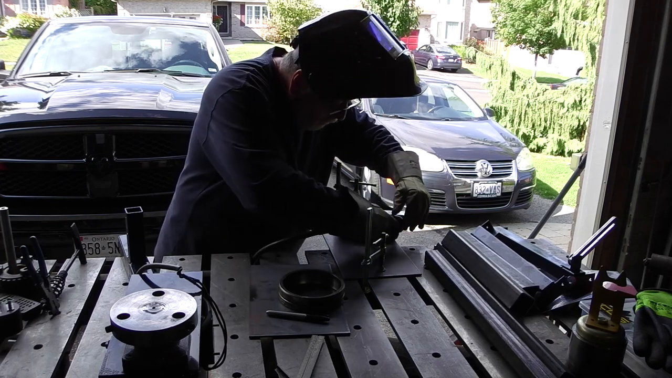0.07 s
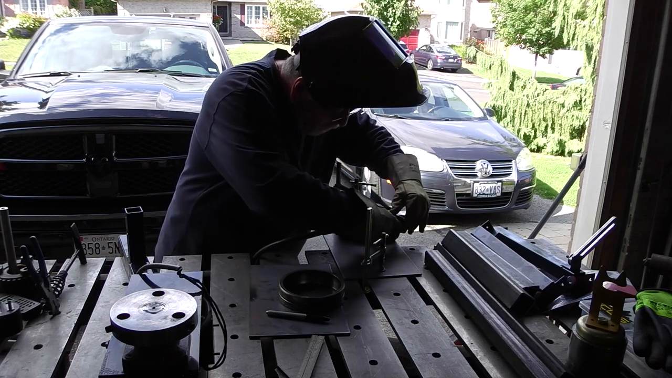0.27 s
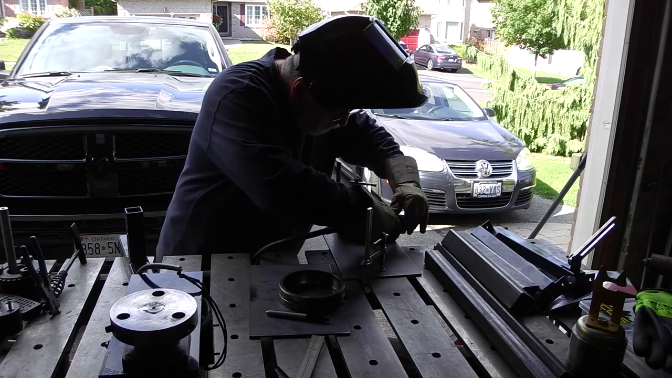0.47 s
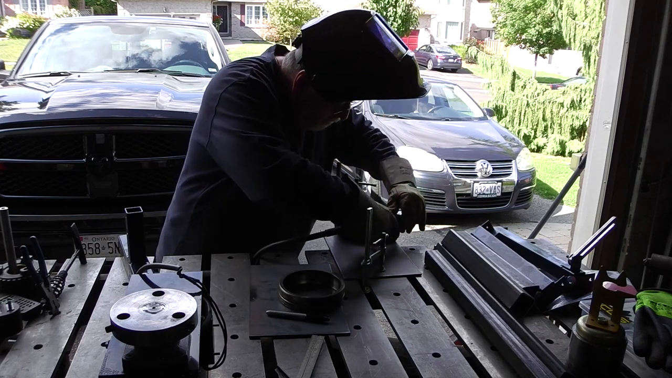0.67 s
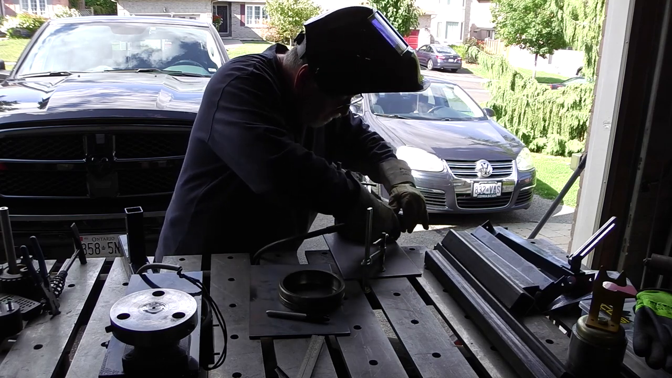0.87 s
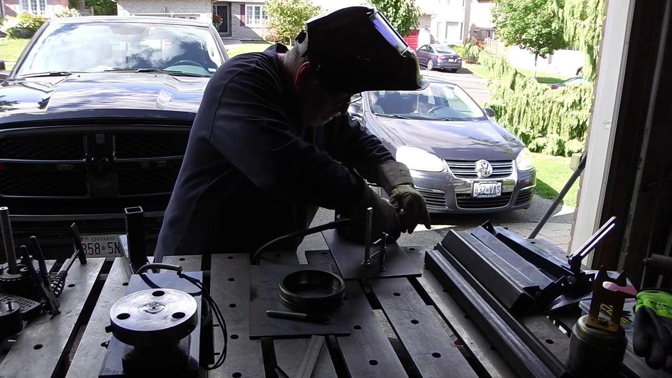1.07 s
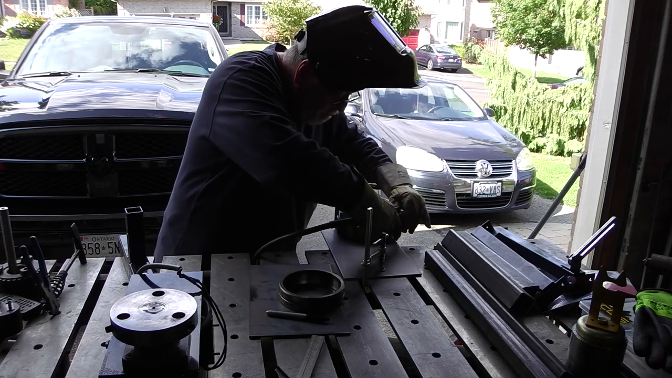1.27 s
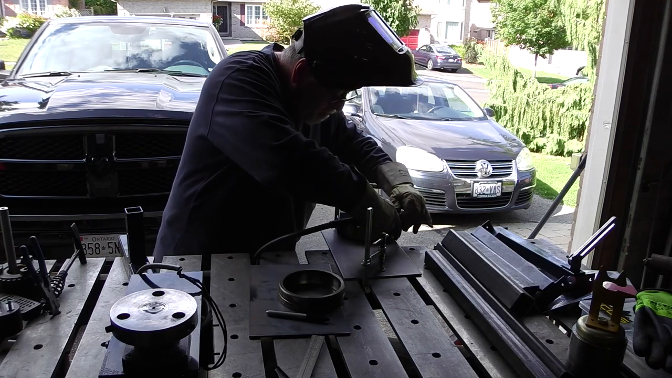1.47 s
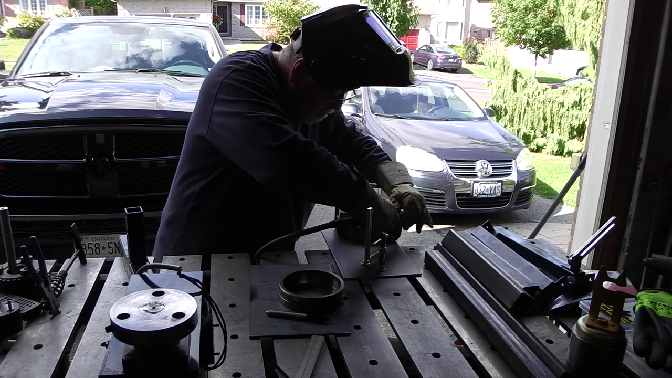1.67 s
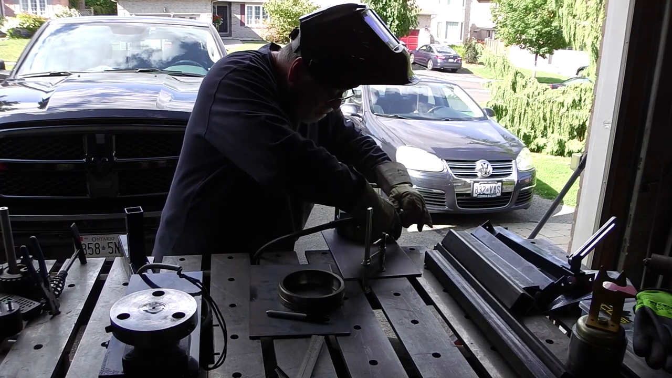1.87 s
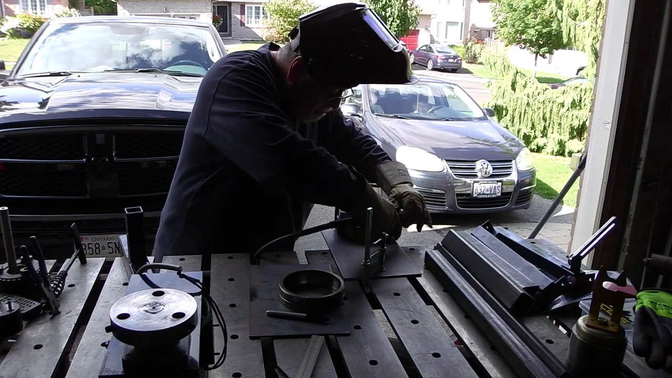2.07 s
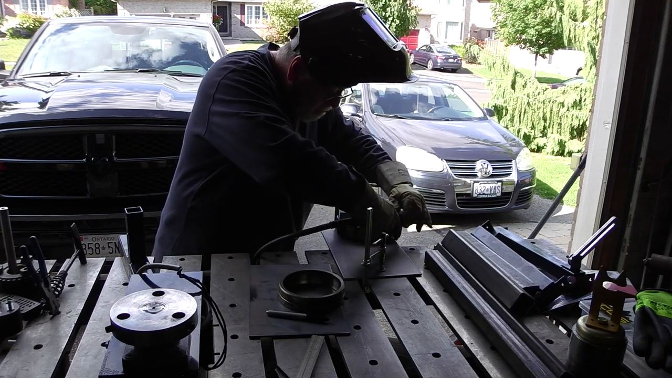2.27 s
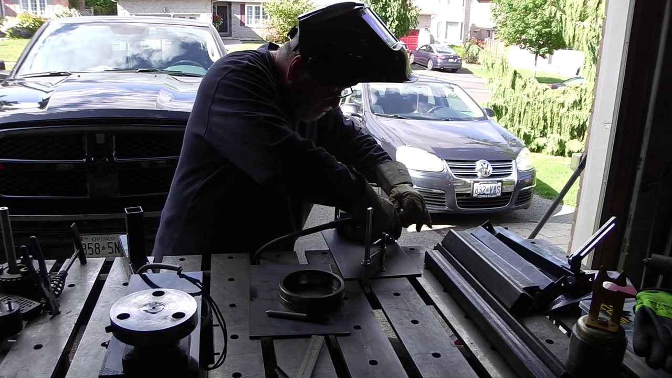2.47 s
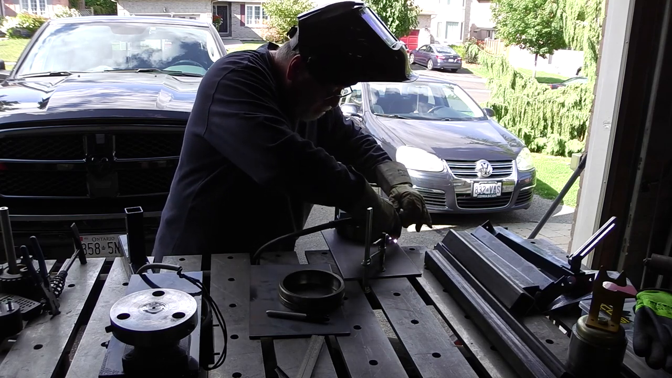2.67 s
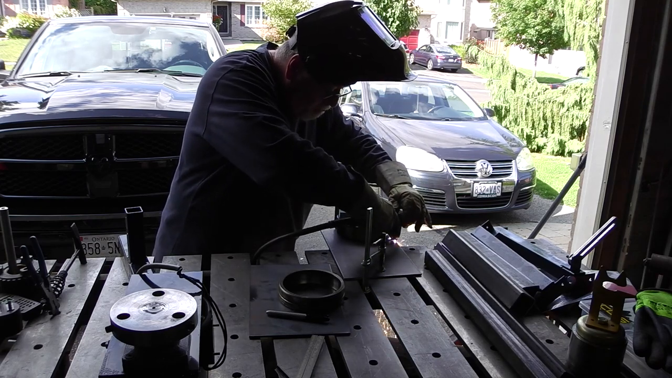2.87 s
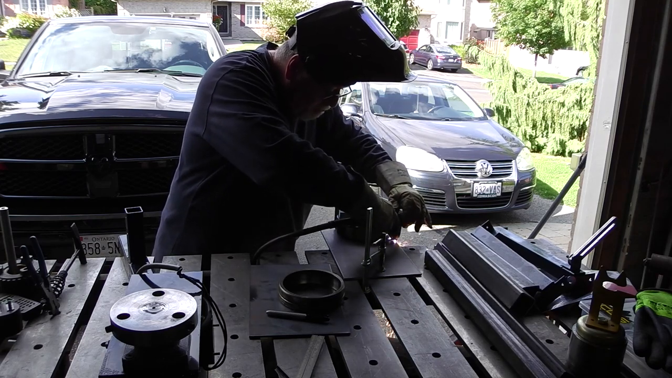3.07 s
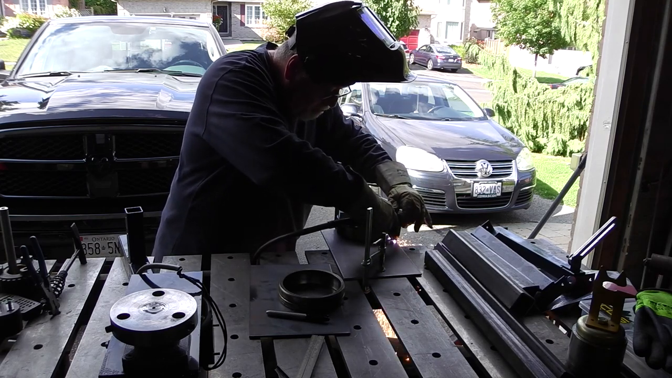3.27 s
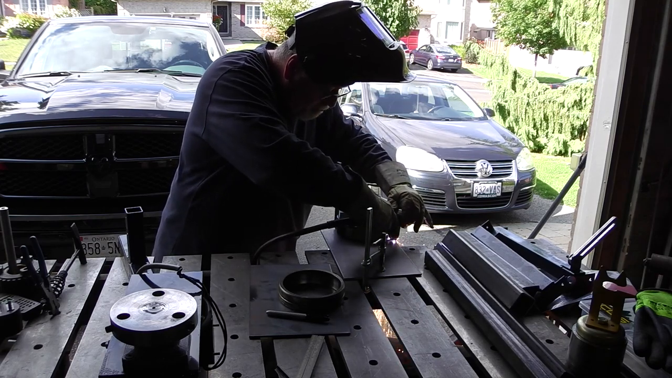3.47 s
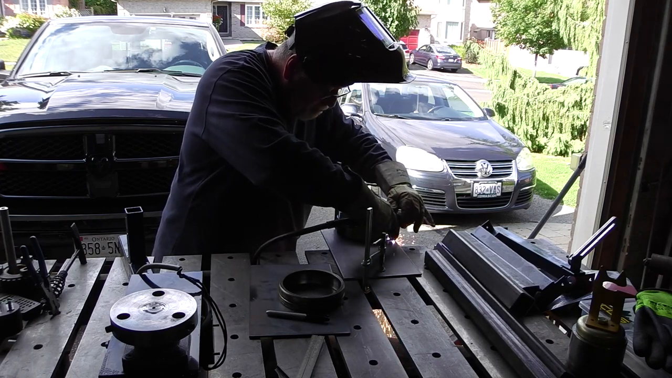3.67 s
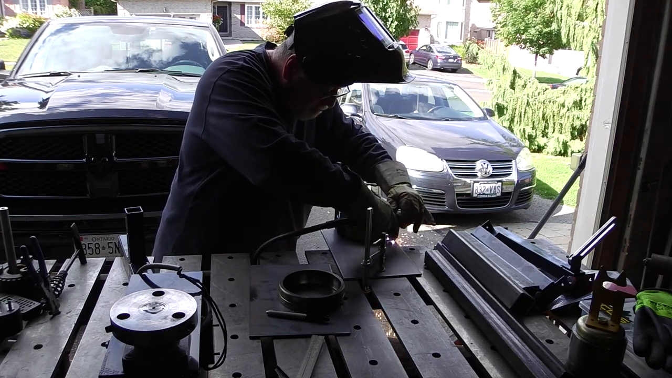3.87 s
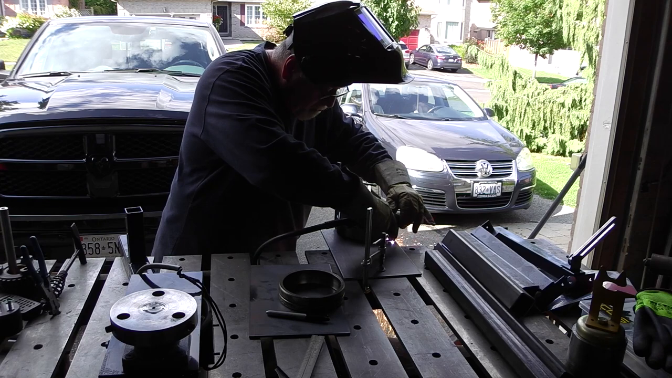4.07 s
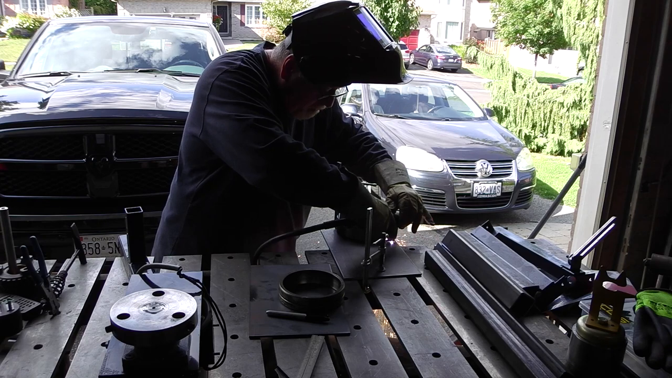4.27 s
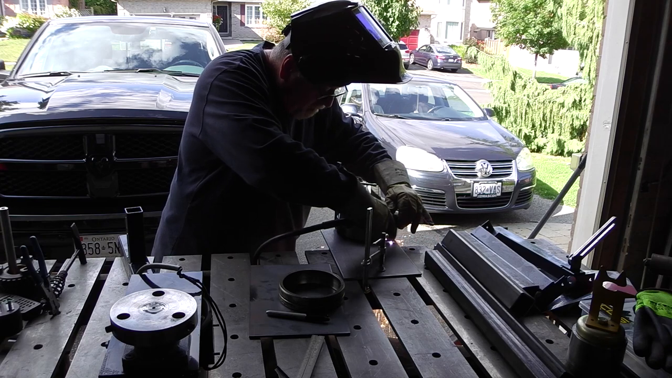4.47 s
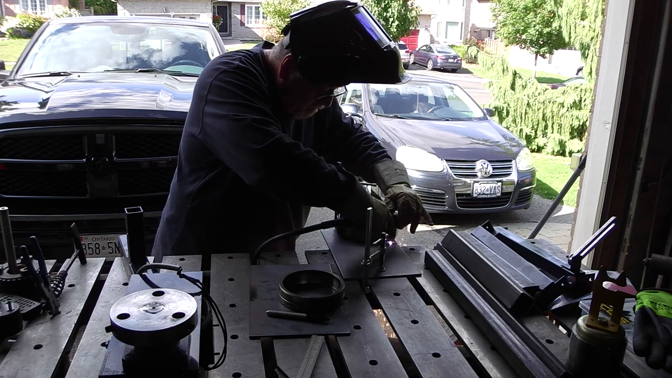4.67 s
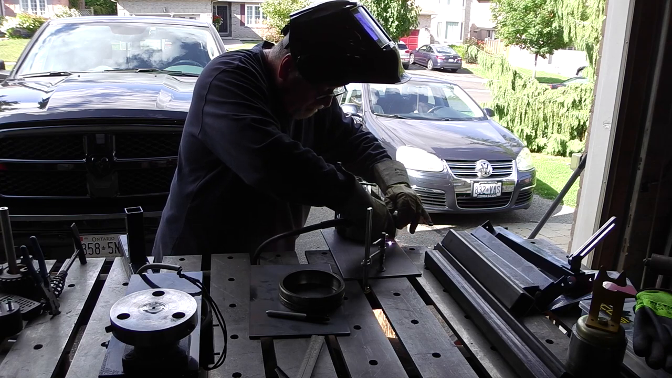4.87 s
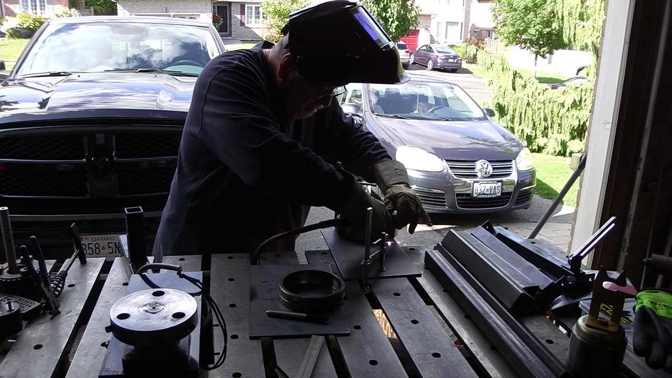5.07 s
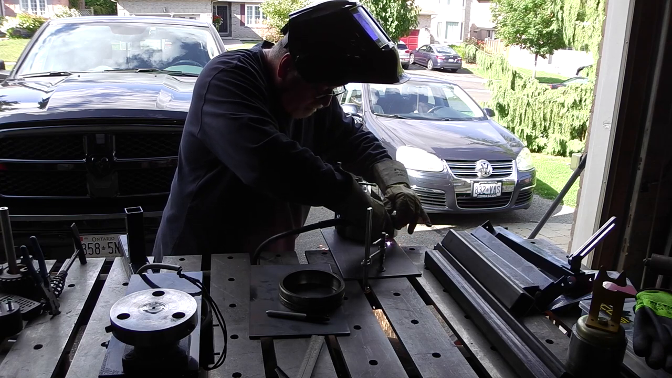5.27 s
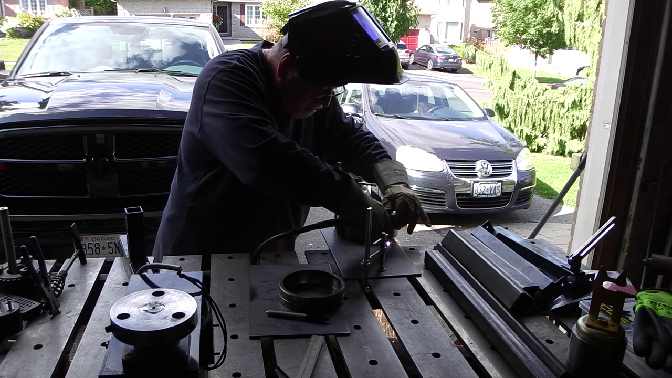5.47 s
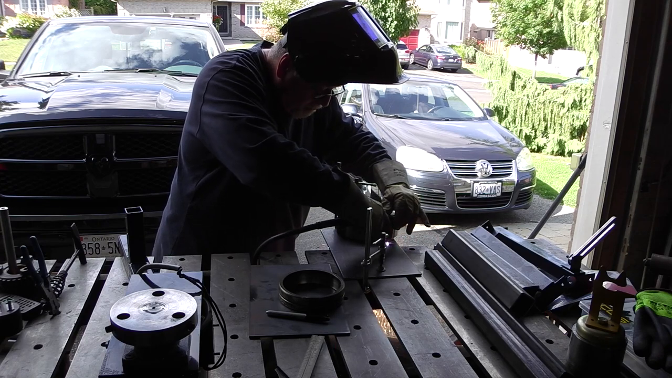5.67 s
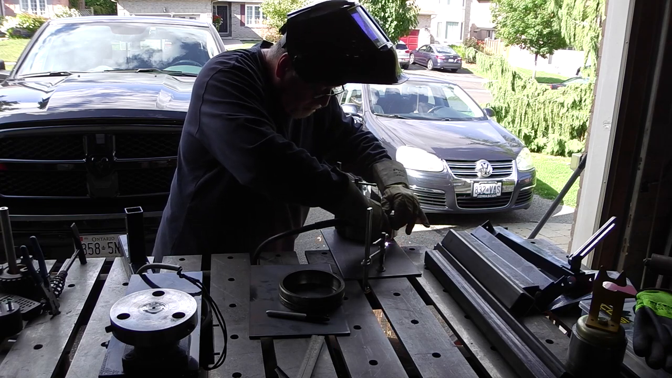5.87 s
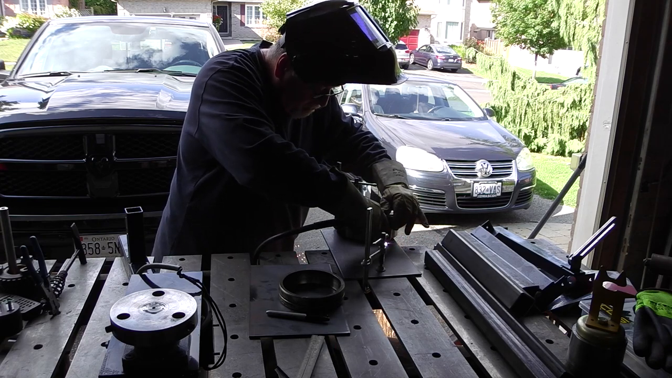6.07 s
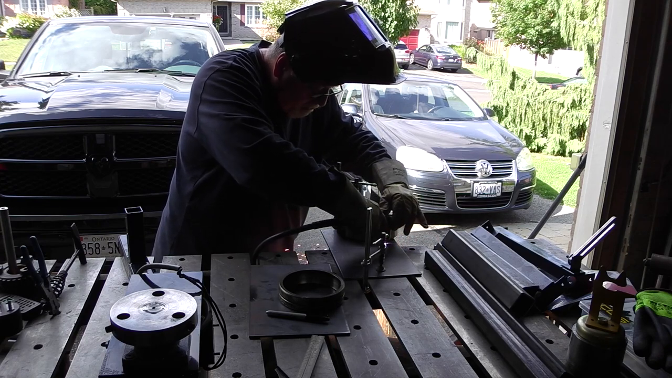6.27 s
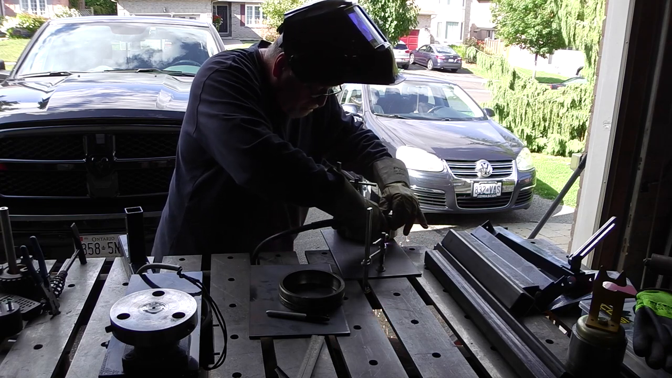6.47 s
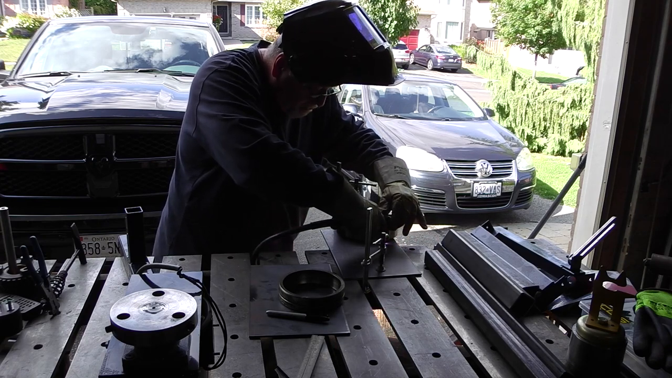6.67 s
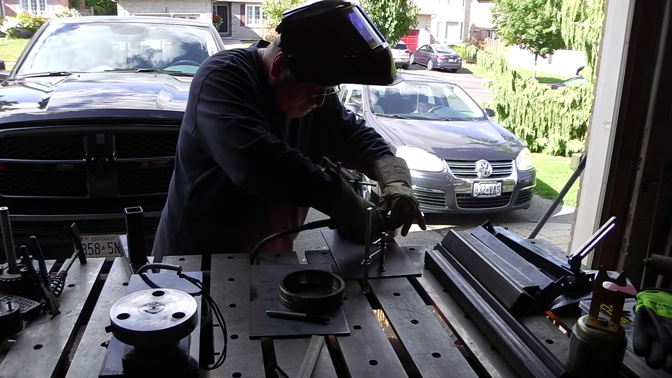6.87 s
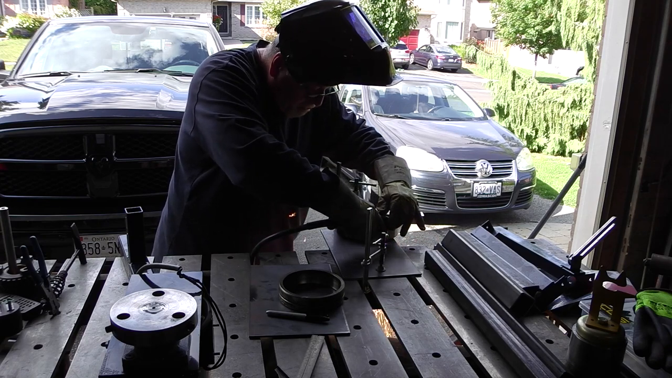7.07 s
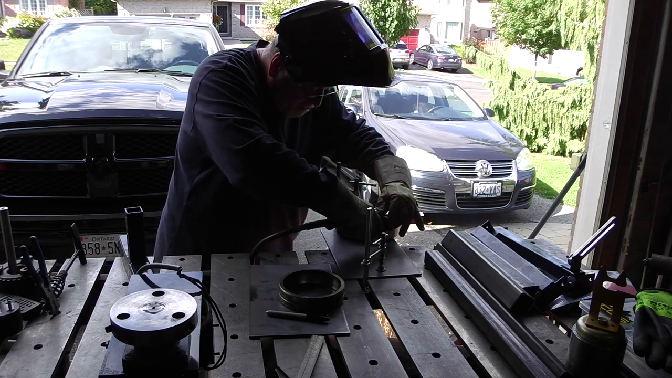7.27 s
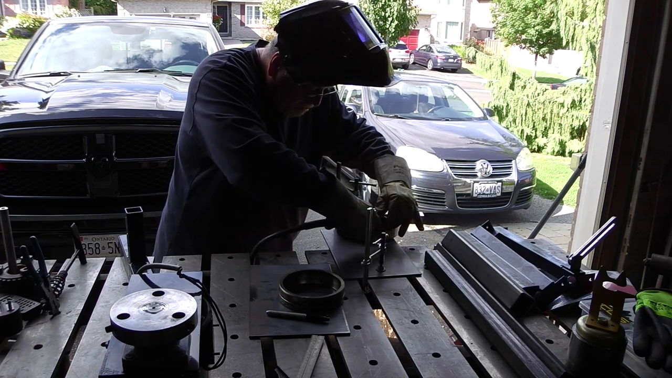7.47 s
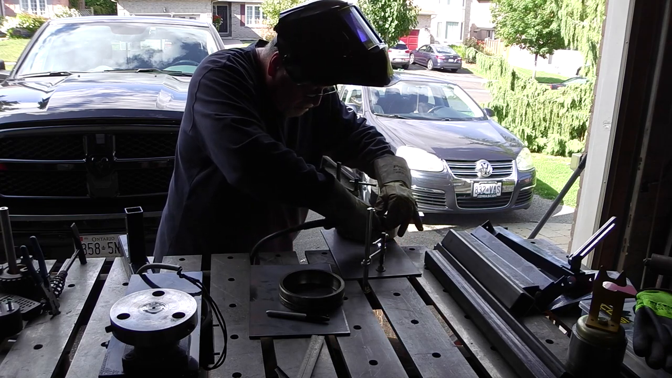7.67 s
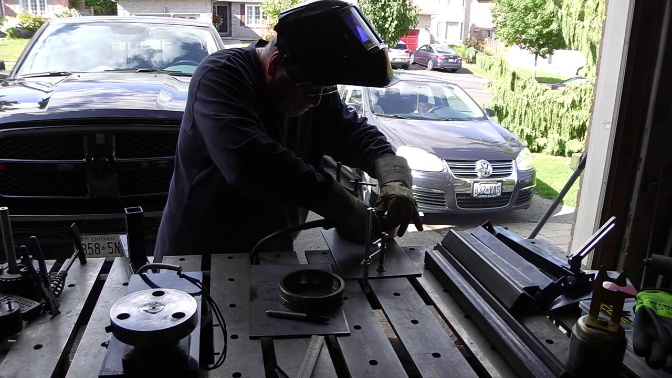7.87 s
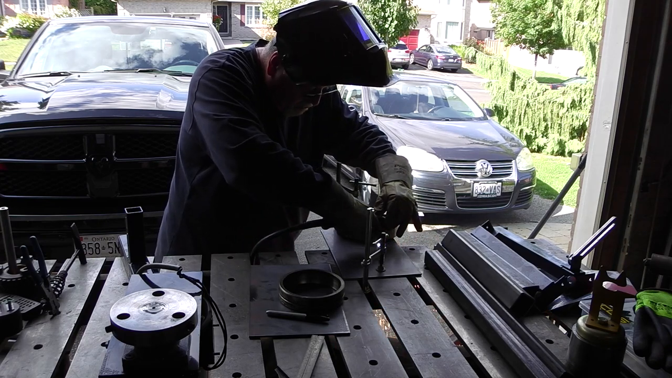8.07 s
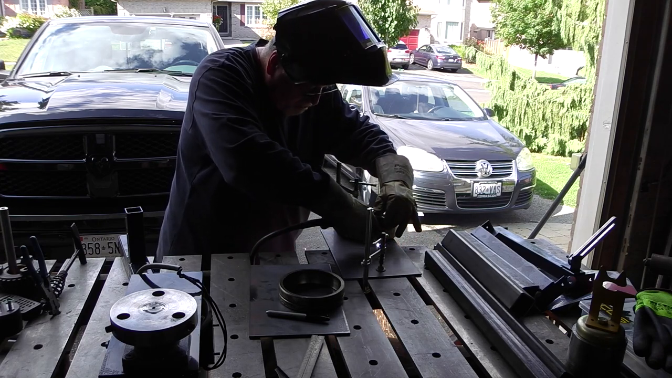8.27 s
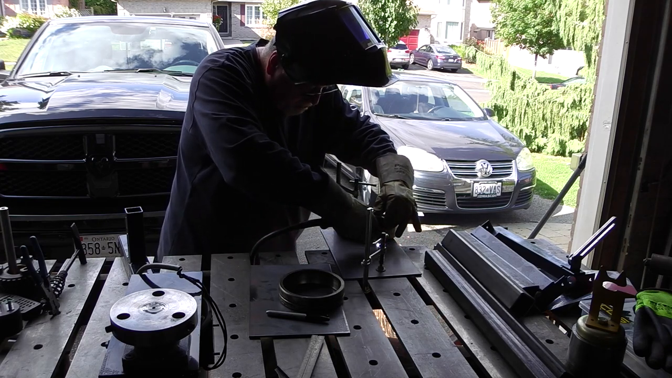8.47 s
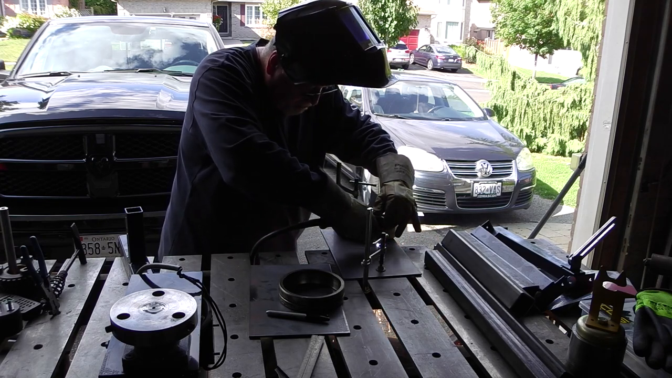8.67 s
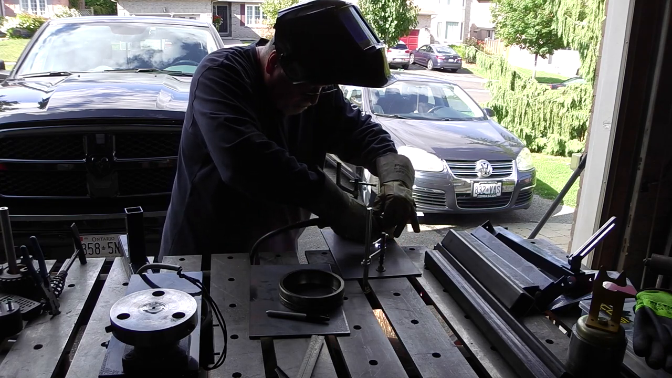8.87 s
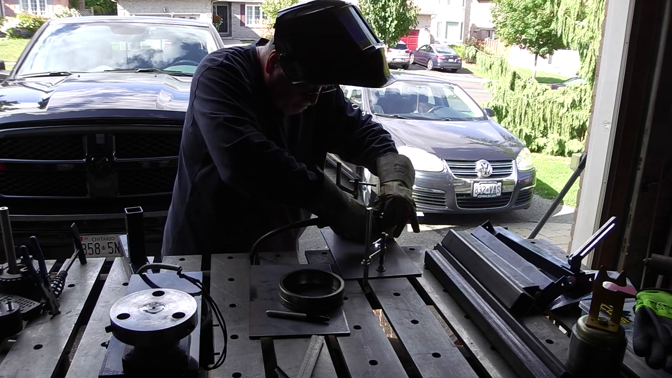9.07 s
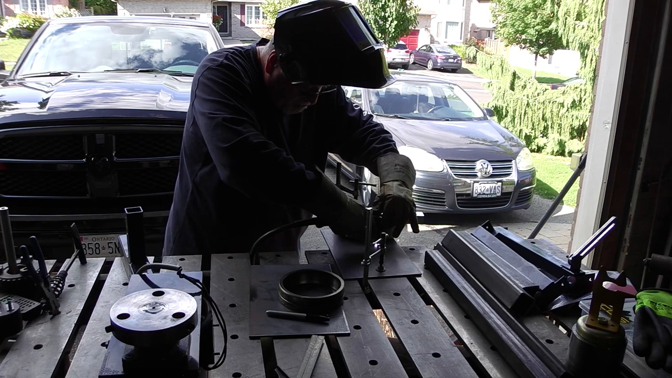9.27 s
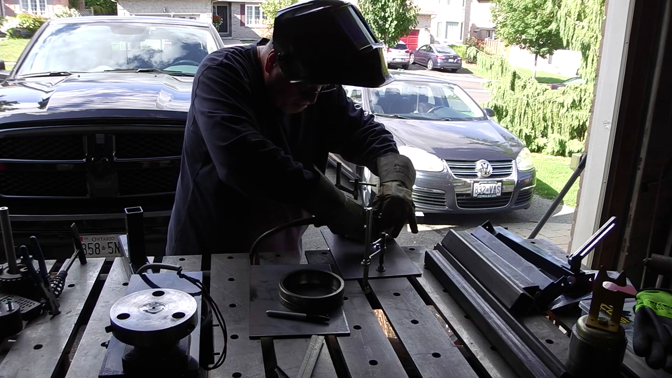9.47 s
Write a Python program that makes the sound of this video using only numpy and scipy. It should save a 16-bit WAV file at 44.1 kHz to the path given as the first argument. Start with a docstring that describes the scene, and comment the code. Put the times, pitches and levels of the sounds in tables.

```python
"""A plasma torch on a circle guide cuts steel plate on a bench in an open garage.
First the guide knocks on the ringing plate and the tip ticks and slides, over the hum of a machine.
Then air hisses out (shaped noise), the arc snaps alight and a hoarse whistle sounds as the jet digs a pit.
The jet pierces the plate and hisses round the circle, spitting crackling melt; all this is filtered noise.
As the loud treble begins, an automatic gain control pushes everything down, so the hum sinks far back."""
import sys
import numpy as np
from scipy import signal
from scipy.fft import rfft, irfft, next_fast_len
from scipy.io import wavfile
from scipy.ndimage import uniform_filter1d, map_coordinates

SR = 44100
rng = np.random.default_rng(int(sys.argv[2]) if len(sys.argv) > 2 else 0)


def pcm_store(signal):
    """Save signal as 16-bit PCM."""
    levels = np.round(np.clip(np.atleast_2d(signal), -1, 1) * 32767)
    wavfile.write(sys.argv[1], SR, levels.astype(np.int16).T)


N = 420713
T = np.arange(N) / SR  # time of each sample, s
HZ = np.fft.rfftfreq(N, 1 / SR)

# Tone colours, which set shape but not loudness: (frequency [Hz], relative level [dB per Hz])
HISS_COLOUR = [(200, -46), (1500, -24.5), (3000, -13), (4400, -11), (5550, -10), (5900, -6.5), (8000, -4),
               (9500, -1), (12000, -0.5), (14000, 0.5), (15000, -2), (15700, -6)]
SLOT_COLOUR = [(200, -36), (1500, -24), (2200, -7), (4400, -5), (6000, -2), (7200, -0.5), (9000, 0),
               (12000, -10), (16000, -22)]
ROAR_COLOUR = [(100, -48), (400, -20.5), (1000, -10), (1450, -0.5), (2000, 2), (3000, -7.5), (4500, -5),
               (8000, -6.5), (16000, -48)]
SPATTER_COLOUR = [(30, -35), (130, -39), (215, -10), (500, -2), (1000, 4), (2000, -3.5), (4000, -7),
                  (16000, -35)]
PUFF_COLOUR = [(60, -38), (150, -22), (245, 1), (380, 0), (600, -3.5), (1200, -12), (5000, -45)]
AIR_COLOUR = [(100, -28), (400, 1), (1500, -8), (3500, 3), (6000, 5), (12000, 5.5), (16000, 1)]
RATTLE_COLOUR = [(60, -45), (300, -13), (550, 0.5), (1000, 2.5), (1800, 5), (2700, -1.5), (3600, -2.5),
                 (4400, -13), (8000, -23), (16000, -33)]
SHOP_COLOUR = [(25, -33), (44, -28), (62, -13), (95, -9.5), (150, -13.5), (235, -18), (350, -20),
               (700, -20.5), (1000, -22), (1450, -24.5), (3500, -29.5), (7700, -38), (15500, -47)]  # fan air and the street

# Resonances of the nozzle, fresh hole, long slot and plate: (frequency [Hz], width [Hz], height over colour [dB])
NOZZLE_PEAKS = [(6990, 110, 3.7), (7250, 150, 1.8), (9100, 49, 1.5), (9400, 70, 2.5), (9530, 71, 2),
                (10400, 90, 1.3), (10560, 160, 2), (11440, 110, 2), (13500, 100, 2.3)]
HOLE_PEAKS = [(2090, 200, 4), (2440, 130, 8), (2900, 54, 3), (3120, 80, 6.5), (3530, 180, 10.5),
              (3660, 120, 2.5), (3785, 60, 8), (3890, 130, 7), (4330, 50, 0), (4560, 120, 2),
              (5270, 150, 4.5)]
SLOT_PEAKS = [(1710, 90, 9), (1960, 120, 6.5), (2480, 65, 6.5), (3000, 130, 7), (3370, 120, 5.5),
              (3546, 160, 9), (3750, 160, 3.5), (5810, 70, 10), (6240, 110, 5), (6950, 90, 8)]
PLATE_PEAKS = [(359, 37, 3), (570, 50, 2), (734, 86, 5.5), (1025, 56, 5), (1180, 50, -2), (2500, 250, 5.5),
               (3280, 350, 5)]

# Strength of the jet at the nozzle as the hand guides the torch: (time [s], relative hiss level [dB])
NOZZLE_LEVEL = [(2.34, -9.5), (2.4, -13.5), (2.53, -7), (2.6, -11), (2.65, -7), (3.05, -7.5), (3.25, -5.5),
                (3.45, -7.5), (3.84, -3), (4.1, -7.5), (4.85, -4.5), (5.2, -6.5), (5.85, -4.5), (6.1, -7.5),
                (7.4, -6), (8.6, -6.5), (8.82, -5.5), (9.2, -7.5)]
# Top treble of the hiss: (time [s], level change [dB])
TOP_LEVEL = [(2.3, 0.5), (3.0, -0.5), (4.2, 1), (5.2, -0.5), (6.1, 1.5), (6.6, 2.2), (7.2, 1), (8.5, 0.5),
             (9.1, 1.3), (9.5, 5)]
# The jet catches the wall of the slot and swells: (middle [s], length [s], relative level [dB])
WALL_SWELLS = [(2.48, .12, -18), (2.665, 0.082, -10), (2.87, 0.25, -9.5), (3.1, 0.21, -11.5),
               (3.46, 0.054, -13.5), (3.69, 0.18, -11.5), (3.91, 0.079, -14.5), (4.47, 0.049, -18),
               (4.7, 0.22, -13), (5.33, 0.16, -14), (5.85, 0.25, -19), (6.44, 0.27, -11.5),
               (6.7, 0.19, -13.5), (7.62, 0.28, -13), (7.86, 0.36, -13), (8.12, 0.093, -23),
               (8.4, 0.39, -15), (8.64, 0.19, -15.5), (9.1, 0.17, -13.5), (9.43, 0.26, -13.5)]
# The jet weakens for a moment: (middle [s], length [s], depth [dB]); a negative depth is a small lift
JET_DIPS = [(3.8, 0.051, 1.5), (5.027, 0.17, 0.5), (5.506, 0.12, 1.5), (6.137, .08, -0.5),
            (6.83, 0.11, 0.5), (8.008, 0.063, 3), (8.233, 0.083, 1.5), (9.233, .06, 1.4)]
# Gouts of melt blown out: (peak [s], length [s], relative spray level [dB], relative low puff level [dB])
GOUTS = [(2.35, .035, -39, -44), (2.682, 0.076, -31, -37.5), (2.9, .14, -39, -50), (3.1, .06, -33, -47),
         (3.177, 0.064, -28.5, -40), (3.37, .09, -36, -43), (3.538, .032, -26.5, -35),
         (3.74, .08, -33.5, -45), (3.932, 0.055, -25.5, -36.5), (4.067, 0.058, -34, -43),
         (4.235, .056, -40, -43), (4.41, .08, -36, -44), (4.795, .08, -36, -46), (5.05, .05, -34, -37),
         (5.13, 0.055, -37, -39), (5.34, 0.16, -39, -45), (5.59, 0.048, -26, -37), (5.768, .1, -37, -46),
         (5.968, 0.098, -34, -44), (6.14, 0.12, -31, -47), (6.237, 0.042, -27.5, -39), (6.6, .06, -36, -43),
         (6.736, 0.14, -28, -40), (7, .07, -32, -40), (7.138, 0.14, -32, -39.5), (7.43, 0.087, -38, -45),
         (7.52, 0.13, -36, -43.5), (8.09, 0.1, -24, -36), (8.772, 0.071, -26, -35.5), (8.86, .05, -36, -45),
         (9.14, .1, -38, -51), (9.31, .095, -26.5, -39.5), (9.51, .07, -33, -45)]
# The disc rings as it comes free:
# (middle [s], length [s], relative level [dB], centre [Hz], width [octaves])
DISC_RINGS = [(6.711, 0.09, -21, 2140, 0.28), (7.42, 0.12, -32, 1810, .3), (8.091, 0.09, -17.5, 2400, .6),
              (8.774, .06, -15.5, 3100, 0.27), (8.785, .05, -28, 1010, 0.081),
              (9.33, .11, -19.5, 2500, 0.24)]
# Snaps of ignition: (time [s], relative level [dB], centre [Hz], width [octaves], time to fall 60 dB [s])
IGNITION_SNAPS = [(2.2445, -46, 8000, 0.76, .03), (2.2752, -2, 4770, 0.25, 0.005),
                  (2.2965, -5.5, 2800, 0.6, 0.016), (2.297, -16.5, 600, 1.8, 0.031),
                  (2.3218, -1.5, 5940, 0.46, 0.04), (2.3225, -6, 4650, 0.066, .04),
                  (2.343, -15, 890, 2.3, 0.094), (2.345, -8.5, 2050, 0.2, 0.11)]
# The guide knocks on the plate: (time [s], relative level [dB], brightness [Hz], rattle time to fall 60 dB [s],
# relative ring strength [ratio], centre of the modes struck [Hz], their spread [octaves])
GUIDE_KNOCKS = [(0.0, -30, 6000, 0.25, 1.48, 1700, 1.9), (.0022, -22.5, 5500, .022, .4, 880, .3),
                (0.013, -34, 4500, .03, .8, 1800, .25), (0.0409, -34, 3500, .035, 0.4, 2100, .8),
                (1.312, -42, 2400, 0.066, .9, 814, 0.62), (1.3264, -47.5, 2000, .04, 5.5, 1040, .11),
                (1.3375, -51, 2600, .025, 1.0, 1100, .25)]
# Modes, the plate's own ringing notes: (frequency [Hz], relative level [dB], time to fall 60 dB [s])
PLATE_MODES = [(356, -6.5, 0.34), (555, -1.5, .3), (693, -5, .29), (892, 1.5, 0.2), (985, -5, 0.31),
               (1173, -4, .27), (1424, -6, .27), (1700, -8, .3), (1798, -1, 0.31), (1860, -6, .22),
               (2135, -8, 0.22), (2400, -10, .27), (2675, -4, 0.18), (3246, -0.5, .2), (3610, -4, .23),
               (4450, -13, 0.25)]
# Thin high ticks while the torch is lined up: (time [s], relative level [dB])
TIP_TICKS = [(.02, -58), (.216, -61), (.337, -60.5), (.716, -66), (1.009, -64), (1.424, -64), (1.463, -65),
             (1.612, -65), (1.857, -59), (1.945, -57)]
# The tip slides over steel: (middle [s], length [s], relative level [dB], centre [Hz], width [octaves])
TIP_SLIDES = [(.44, 0.17, -69, 8650, .035), (.52, 0.27, -66.5, 6800, 0.42), (1.735, 0.026, -57, 8900, .1),
              (1.845, 0.04, -66, 8500, .5)]
# Steady tones of the machine's motor and fan: (frequency [Hz], relative level [dB])
MACHINE_TONES = [(59, -65), (116.7, -60.5), (173, -63.5), (205, -71.5), (295, -70), (319, -68),
                 (352, -65.5), (613, -70), (1238, -67.5)]
# Two motor tones that swell and fade: (time [s], relative fundamental level [dB], relative octave level [dB])
MOTOR_LEVELS = [(0.1, -52, -60), (.42, -55.5, -53.5), (.7, -53, -56), (1.05, -57, -48.5), (1.3, -56, -64),
                (1.48, -58, -54), (1.64, -50, -58), (1.85, -56, -52), (2.2, -57, -52), (2.5, -53, -59)]
# The room tone is wide in the treble: (frequency [Hz], side minus middle [dB])
SHOP_WIDTH = [(80, -24), (250, -15), (1300, -17), (2400, -14), (3700, -9), (5600, -7), (9000, -1),
              (15000, -1)]
# Where the torch is heard: (time [s], left minus right [dB])
TORCH_PAN = [(2.3, -1.0), (4.5, -1.0), (6, -1.4), (9.5, -1.4)]
# Plate and bench throw back treble most: (frequency [Hz], relative level of the reflections [dB])
REFLECTIONS = [(100, -2.5), (1400, -3), (2200, -6.5), (3700, -4), (7000, -3), (15000, 2)]
# How alike reflected sound is in the two ears: (frequency [Hz], likeness [0 to 1])
EAR_LIKENESS = [(60, .3), (300, 0.74), (700, 0.66), (1400, 0.88), (2400, 1), (3700, 1), (5500, 0.25),
                (9000, 0.3), (15000, 0.14)]

AIR_ON_S, AIR_FULL_S, ARC_ON_S = 2.244, 2.279, 2.3215
THROUGH_S = 3.05  # the jet breaks through the plate
SLOT_SETTLE_S, ROAR_DROP_S = 1, 0.19  # how long each takes to settle after that
SLOT_PIERCE_DB, SLOT_RUN_DB, SLOT_GROWTH_DB_PER_S = -12, -16.5, 0.02
ROAR_PIERCE_DB, ROAR_RUN_DB = -21.5, -25.5
ROAR_BUILD_DB_PER_S, ROAR_FULL_S = 12, 3.16  # the roar builds as the hole deepens
ROAR_GROWTH_DB_PER_S = 1.01  # and grows again as the slot gets longer
SLOT_OPEN_PER_S = 0.19  # share of power passing each second from hole to long slot
HOLE_DRIFT, HOLE_DRIFT_HZ = 0.005, 7  # typical pitch wander as a share, and its speed
TOP_TREBLE_HZ = 11100
HUMP_STEEPNESS = 3  # 2 is a bell, more is squarer
GOUT_STEEPNESS, GOUT_LEAN = 1.47, 0.18  # a gout bursts out quickly and trails away
MODE_SPLIT_HZ = 14  # smallest gap between a mode and its twin
MOTOR_HZ, HUM_WAVER_HZ = 73.4, 5.2
BAND_LIMIT_HZ = 15730


def torch(air_db=-15.0, air_rise_db_per_s=1300):
    """Cold air builds up first; the arc then heats it to a far louder jet."""
    lit = np.clip((T - ARC_ON_S) / .001, 0, 1)
    seconds_to_full = np.maximum(AIR_FULL_S - np.maximum(T, AIR_ON_S), 0)
    air_level = amp(air_db - air_rise_db_per_s * seconds_to_full) * (T > AIR_ON_S)
    air = coloured(noise(), AIR_COLOUR) * air_level
    return air * (1 - lit) + lit * jet()


def jet(swell_roar_db=-12.5):
    """Rough gas flow at the nozzle, in the slot and under the plate, shaken together by the restless arc."""
    swells = humps(WALL_SWELLS)
    dips_db = sum(depth * np.exp(-np.minimum((2 * (T - s) / length_s) ** 2, 20))
                  for s, length_s, depth in JET_DIPS)
    slot_level = np.hypot(amp(slot_level_db()), swells)
    slot = slot_noise() * slot_level * amp(1.0 * wander(29))
    roar_level = np.hypot(amp(roar_level_db()), amp(swell_roar_db) * swells)
    roar = coloured(noise(), ROAR_COLOUR) * roar_level * amp(1.0 * wander(140))  # fast wander adds grit
    shared_db = 0.39 * wander(45) + 0.44 * wander(16) - dips_db
    return (nozzle_hiss() + slot + roar) * amp(shared_db)


def nozzle_hiss(hiss_db=1.5):
    """Gas rushing from the nozzle makes coloured noise; its top treble has a level of its own."""
    hiss = coloured(noise(), HISS_COLOUR, NOZZLE_PEAKS) * amp(curve(NOZZLE_LEVEL) + hiss_db)
    highpass = signal.butter(3, TOP_TREBLE_HZ, "high", fs=SR, output="sos")
    top = signal.sosfiltfilt(highpass, hiss)
    return hiss - top + top * amp(curve(TOP_LEVEL) + 0.1 * wander(20))


def slot_noise():
    """Rough flow in the cut: the fresh hole's resonances give way to those of the long slot."""
    opened = np.clip(SLOT_OPEN_PER_S * (T - THROUGH_S), 0, 1)
    hole = drifting(coloured(noise(), SLOT_COLOUR, HOLE_PEAKS))
    long_slot = coloured(noise(), SLOT_COLOUR, SLOT_PEAKS)
    return np.sqrt(1 - opened) * hole + np.sqrt(opened) * long_slot


def drifting(x):
    """The hole changes shape as the torch moves on: uneven reading speed makes its resonances wander."""
    lag = np.cumsum(HOLE_DRIFT * wander(HOLE_DRIFT_HZ))  # in samples
    return map_coordinates(x, [np.arange(N) + lag], order=3, mode="mirror")


def slot_level_db():
    """Piercing is loud in the slot; the sound settles once the jet runs freely through the plate."""
    running_db = SLOT_RUN_DB + SLOT_GROWTH_DB_PER_S * (T - THROUGH_S)
    return running_db + (SLOT_PIERCE_DB - running_db) * breakthrough(SLOT_SETTLE_S)


def roar_level_db():
    """The roar builds during piercing, collapses at breakthrough, then grows with the slot."""
    digging_db = ROAR_PIERCE_DB - ROAR_BUILD_DB_PER_S * np.maximum(ROAR_FULL_S - T, 0)
    running_db = ROAR_RUN_DB + ROAR_GROWTH_DB_PER_S * (T - THROUGH_S)
    return running_db + (digging_db - running_db) * breakthrough(ROAR_DROP_S)


def breakthrough(length_s):
    """1 while the jet is piercing, falling to 0 within length_s once it is through."""
    return np.clip(1 - (T - THROUGH_S) / length_s, 0, 1)


def melt(level_db=0.5, drops_per_s=1500, rush=0.66):
    """Molten drops crackle densely; gouts come with low puffs, and the disc rings under some heavier ones."""
    drop_db = 2.5 * np.minimum(rng.exponential(1, N), 4)
    drops = (rng.random(N) < drops_per_s / SR) * np.sign(noise()) * amp(drop_db)
    # the fine, uneven spray between gouts
    drizzle = amp(-39.5 + 2.2 * wander(3.0)) * (T > ARC_ON_S)
    sprays = humps([(s, length_s, db) for s, length_s, db, _ in GOUTS], GOUT_STEEPNESS, GOUT_LEAN)
    puffs = humps([(s, length_s, db) for s, length_s, _, db in GOUTS], GOUT_STEEPNESS, GOUT_LEAN)
    crackle = coloured(evened(drops) + rush * noise(), SPATTER_COLOUR, PLATE_PEAKS)
    spatter = crackle * np.hypot(drizzle, sprays) * amp(level_db)
    low_puffs = coloured(noise(), PUFF_COLOUR, PLATE_PEAKS) * puffs * amp(2.0 * wander(60))
    return (spatter + surges(DISC_RINGS)) * amp(2.0 * wander(67)) + low_puffs


def whistle(hz=3800, jitter_hz=90, level_db=-10, start_s=2.345, rise_s=0.021, hold_s=0.058, fall_60db_s=0.06):
    """The jet blows across the pit it is digging and whistles hoarsely until the pit opens."""
    phase = 2 * np.pi * np.cumsum(hz + jitter_hz * wander(350)) / SR
    tone = evened(np.sin(phase) * amp(3.0 * wander(200)))  # fast level changes make it hoarse
    attack = np.clip((T - start_s) / rise_s, 0, 1) ** 2
    release_db = -60 * np.clip((T - start_s - rise_s - hold_s) / fall_60db_s, 0, 3)
    return tone * attack * amp(level_db + release_db)


def ignition():
    """The arc snaps alight in short bursts of noise."""
    return bursts(IGNITION_SNAPS)


def knocks():
    """The plate rattles on the bench and rings; the place struck picks the modes heard."""
    out, t = np.zeros(N), T[:SR // 2]
    for s, db, bright_hz, rattle_t60, ring, centre_hz, octaves in GUIDE_KNOCKS:
        modes = np.zeros(len(t))
        for hz, mode_db, t60 in PLATE_MODES:
            struck = np.exp(-.5 * (np.log2(hz / centre_hz) / octaves) ** 2)
            modes += struck * amp(mode_db - 60 * t / t60) * mode_pair(t, hz)
        rattle = coloured(rng.standard_normal(len(t)), RATTLE_COLOUR) * amp(-60 * t / rattle_t60)
        lowpass = signal.butter(1, bright_hz, fs=SR)
        add(out, s, amp(db) * signal.lfilter(*lowpass, rattle + ring * modes / 2))
    return out


def mode_pair(t, hz, twin=.6):
    """A mode and its weaker twin, slightly out of tune, so that the pair beats."""
    phase, twin_phase, split = rng.random(3)
    twin_hz = hz + MODE_SPLIT_HZ * (1 + split)
    main_tone = np.sin(2 * np.pi * (hz * t + phase))
    twin_tone = np.sin(2 * np.pi * (twin_hz * t + twin_phase))
    return (main_tone + twin * twin_tone) / np.hypot(1, twin)


def lining_up(count=22):
    """The torch tip ticks and slides lightly over the steel, with fainter ticks in between."""
    faint = [(AIR_ON_S * (k + rng.random()) / count, -69 + 1.2 * rng.standard_normal())
             for k in range(count)]
    # each tick: centre 11900 Hz, width .055 octaves, 60 dB down after 0.048 s
    ticks = bursts([(s, db, 11900, .055, 0.048) for s, db in TIP_TICKS + faint])
    return surges(TIP_SLIDES) + ticks


def workshop(shop_db=-54.5):
    """The machine's wavering hum sits in the middle, over the wide rush of its fan and the street."""
    level = amp(shop_db)
    colour = amp(read(SHOP_COLOUR, HZ))
    side_share = np.linalg.norm(colour * amp(read(SHOP_WIDTH, HZ))) / np.linalg.norm(colour)
    middle = coloured(noise(), SHOP_COLOUR) * level + machine_hum()
    side = filtered(noise(), lambda f: amp(read(SHOP_COLOUR, f) + read(SHOP_WIDTH, f)))
    side = side * level * side_share
    return np.array([middle + side, middle - side])


def machine_hum(hum_db=-1.5, waver_db=1.5, drift_turns=0.065):
    """Turning parts make steady tones, each wavering a little in level and phase."""
    tones = MACHINE_TONES + [(k * MOTOR_HZ, curve(MOTOR_LEVELS, column=k)) for k in (1, 2)]
    hum = np.zeros(N)
    for hz, db in tones:
        turns = hz * T + drift_turns * wander(HUM_WAVER_HZ)
        hum += amp(db + waver_db * wander(HUM_WAVER_HZ)) * np.sin(2 * np.pi * turns)
    return amp(hum_db) * hum


def garage(x, wet_db, count=1):
    """Plays x from count places in turn, so that the echo pattern drifts as the source moves."""
    out = np.zeros((2, N))
    place = T / T[-1] * (count - 1)
    for k in range(count):
        near = np.flatnonzero(abs(place - k) < 1)
        part = x[near] * np.cos(np.pi / 2 * (place[near] - k))  # fade from place to place
        for channel, response in zip(out, echoes(wet_db)):
            add(channel, T[near[0]], signal.fftconvolve(part, response))
    return out


def echoes(wet_db, bench_s=0.0074, garage_t60=0.38, garage_db=3):
    """Stereo response: the direct sound, quick scatter from bench and tools, then the garage."""
    t = T[:SR // 3]
    hz = np.fft.rfftfreq(len(t), 1 / SR)
    bench_power = evened(np.exp(-t / bench_s)) ** 2
    garage_power = (amp(garage_db) * evened(amp(-60 * t / garage_t60))) ** 2
    power = bench_power + garage_power
    scatter = rng.standard_normal((2, len(t))) * np.sqrt(power / power.sum()) * (t > .001)
    left, other = rfft(scatter)
    same = np.clip(read(EAR_LIKENESS, hz), -1, 1)
    wet = amp(wet_db + read(REFLECTIONS, hz))
    reflected = np.array([left, same * left + np.sqrt(1 - same ** 2) * other])
    return irfft((1 + wet * reflected) / np.sqrt(1 + wet ** 2), len(t))


def bursts(rows):
    """Each snap or tick is a band of noise that starts at once and dies away."""
    out, t = np.zeros(N), T[:SR // 4]
    for s, db, hz, octaves, t60 in rows:
        fade = amp(-60 * t / t60)
        burst = evened(band(len(t), hz, octaves) * fade)
        add(out, s, amp(db) * burst * np.sqrt(np.mean(fade ** 2)))
    return out


def surges(rows):
    """Each scrape or ring is a band of noise that swells and fades."""
    out = np.zeros(N)
    for s, length_s, db, hz, octaves in rows:
        t = np.arange(-2 * length_s, 2 * length_s, 1 / SR)
        swell = np.exp(-.5 * abs(2 * t / length_s) ** HUMP_STEEPNESS)
        add(out, s - 2 * length_s, amp(db) * band(len(t), hz, octaves) * swell)
    return out


def humps(rows, steepness=HUMP_STEEPNESS, lean=0):
    """Level of a train of rounded swells whose powers add; leaning ones rise faster than they fall."""
    power = np.zeros(N)
    for s, length_s, db in rows:
        t = np.arange(-2 * length_s, 3 * length_s, 1 / SR)
        leaning_t = t - lean * abs(t)
        add(power, s - 2 * length_s, amp(db) ** 2 * np.exp(-abs(2 * leaning_t / length_s) ** steepness))
    return np.sqrt(power)


def band(size, hz, octaves):
    """Noise of rms 1 in a band around hz."""
    return filtered(rng.standard_normal(size),
                    lambda f: np.exp(-.5 * (np.log2((f + 1) / hz) / octaves) ** 2))


def coloured(x, colour, peaks=()):
    """Gives x a broad colour with resonances standing on it; the result has rms 1."""
    def gain(f):
        peaks_db = sum(db / (1 + (2 * (f - hz) / width) ** 2) for hz, width, db in peaks)
        return amp(read(colour, f) + peaks_db)
    return filtered(x, gain)


def filtered(x, gain):
    """Filters x by a function of frequency; the result has rms 1."""
    size = next_fast_len(len(x), True)
    spectrum = rfft(x, size) * gain(np.fft.rfftfreq(size, 1 / SR))
    return evened(irfft(spectrum, size)[:len(x)])


def noise():
    """White noise for the whole scene."""
    return rng.standard_normal(N)


def wander(hz, size=32):
    """Smooth chance movement up to about hz, rms about 1; drawn once in every size samples."""
    draws = rng.standard_normal(len(T[::size]))
    slow = filtered(draws, lambda f: np.exp(-np.minimum(f / size / hz, 20) ** 2))
    return np.interp(T, T[::size], slow)


def curve(rows, column=1):
    """One column of a time table at every sample."""
    rows = np.asarray(rows)
    return np.interp(T, rows[:, 0], rows[:, column])


def read(points, hz):
    """Reads a spectrum on a log-frequency axis."""
    f, value = np.transpose(points)
    return np.interp(np.log(hz + 1), np.log(f), value)


def amp(db):
    """Decibels to gain."""
    return 10 ** (np.asarray(db) / 20)


def evened(x):
    """Scales to rms 1 (rms is the average strength)."""
    return x / np.sqrt(np.mean(x ** 2) + 1e-20)


def add(mix, s, sound):
    """Mixes a sound in at time s."""
    part = mix[max(round(s * SR), 0):][:len(sound)]
    part += sound[:len(part)]


def scene():
    """The moving torch, its scattering melt and the small sounds at the bench, in the garage."""
    cutting = garage(torch(), wet_db=2.5, count=11) + garage(melt(), wet_db=2.0, count=8)
    pan_db = curve(TORCH_PAN)
    cutting = cutting * amp(np.array([pan_db, -pan_db]) / 2)
    clacks = garage(knocks() + ignition() + whistle(), wet_db=-6.0)
    ticks = garage(lining_up(), wet_db=-7)
    return cutting + (clacks + ticks + workshop()) * amp([[-.4], [.4]])  # slightly to the right


def record(dry, threshold_db=-36, sense_hz=6000, quick_db=19.5, slow_db=6, slow_s=1.14, recovery_db_per_s=3):
    """Gain control: loud treble drops the gain at once, up to quick_db, then slowly further; band limit."""
    treble = signal.lfilter(*signal.butter(2, sense_hz, "high", fs=SR), dry)
    power = uniform_filter1d((treble ** 2).mean(0), size=100)
    power_db = 10 * np.log10(abs(power) + 1e-12)
    wanted_db = np.clip(power_db - threshold_db, 0, quick_db)
    # hold each drop, letting go of it at a steady rate
    recovered_db = recovery_db_per_s * T
    held_db = np.maximum.accumulate(wanted_db + recovered_db) - recovered_db
    step = 1 / (slow_s * SR)
    settled_db = slow_db * signal.lfilter([step], [1, step - 1], held_db / quick_db)
    ducked = dry * amp(-held_db - settled_db)
    lowpass = signal.firwin(601, BAND_LIMIT_HZ, window=("kaiser", 8), fs=SR)
    return signal.oaconvolve(ducked, lowpass[None], "same")


dry = scene()
out = record(dry)
pcm_store(out)
```